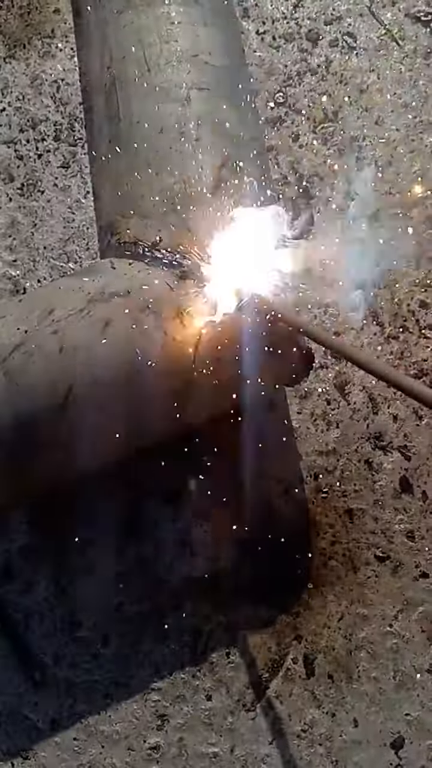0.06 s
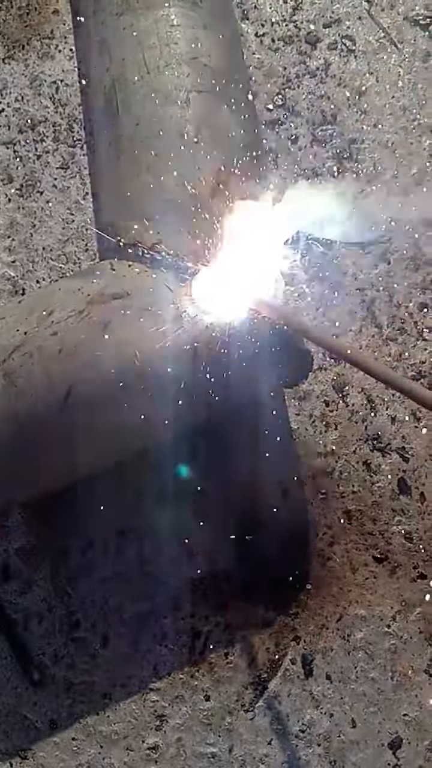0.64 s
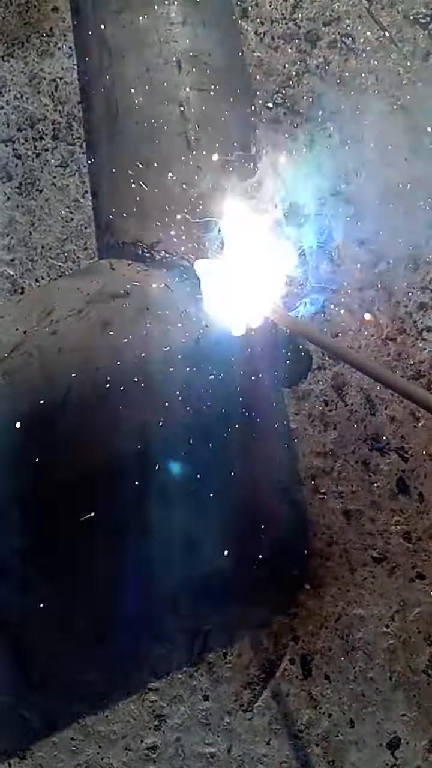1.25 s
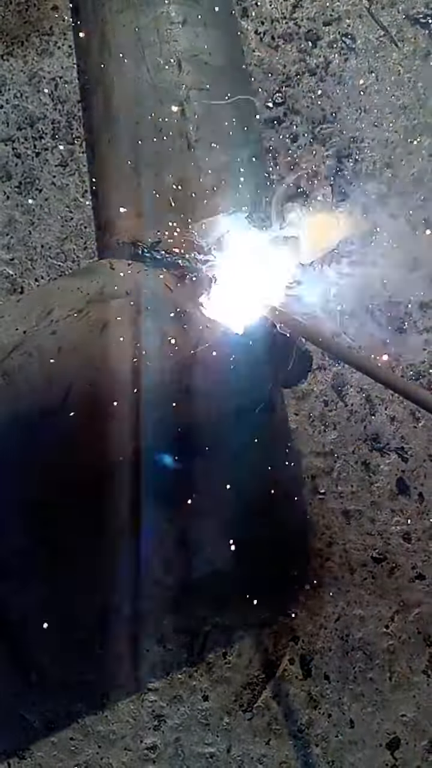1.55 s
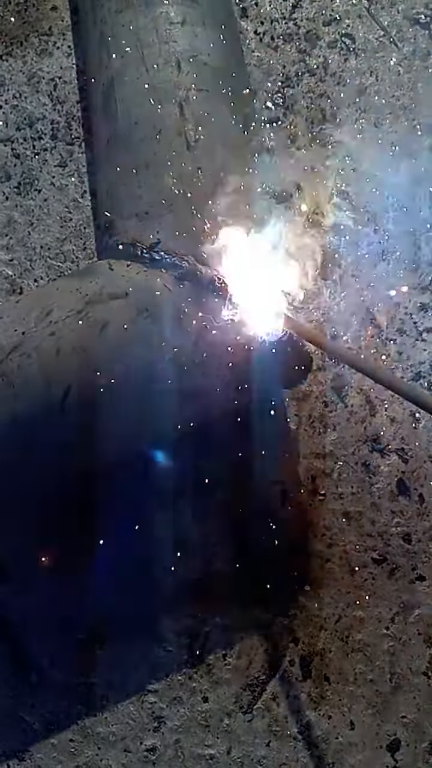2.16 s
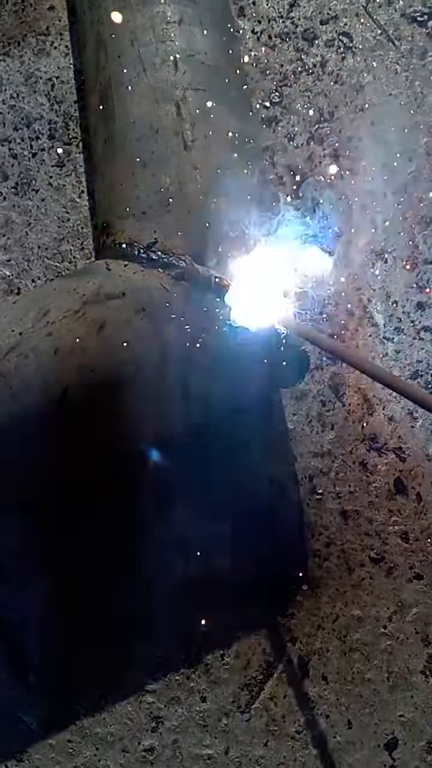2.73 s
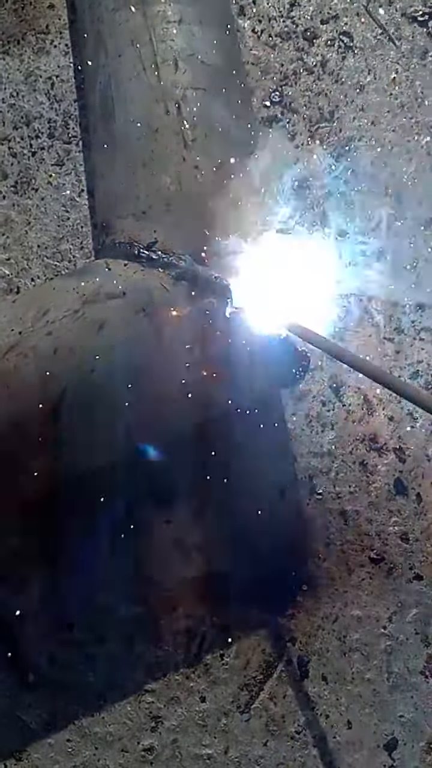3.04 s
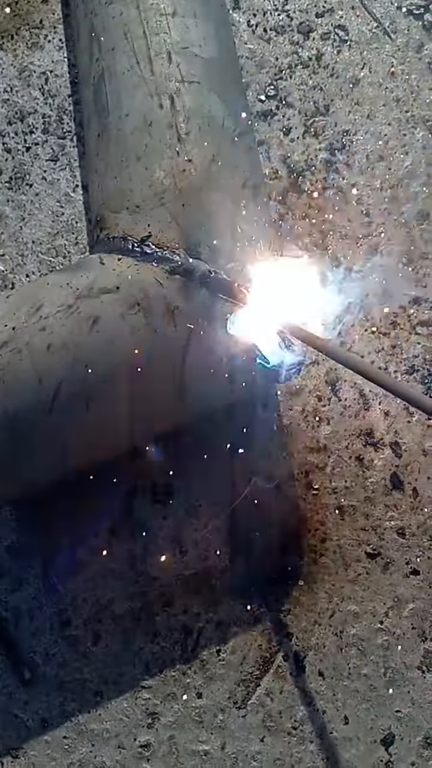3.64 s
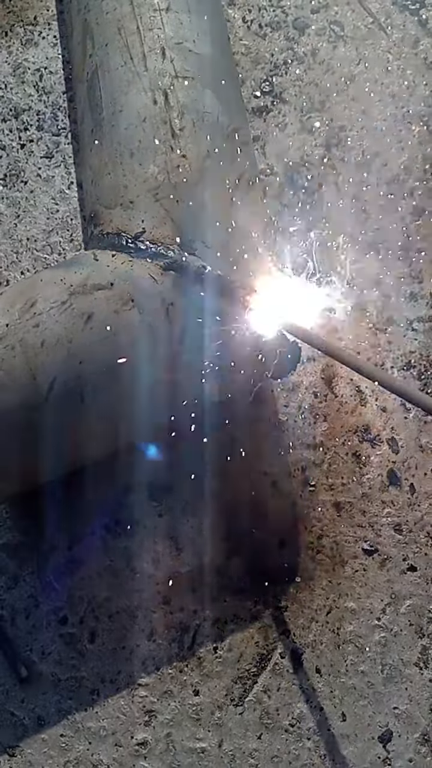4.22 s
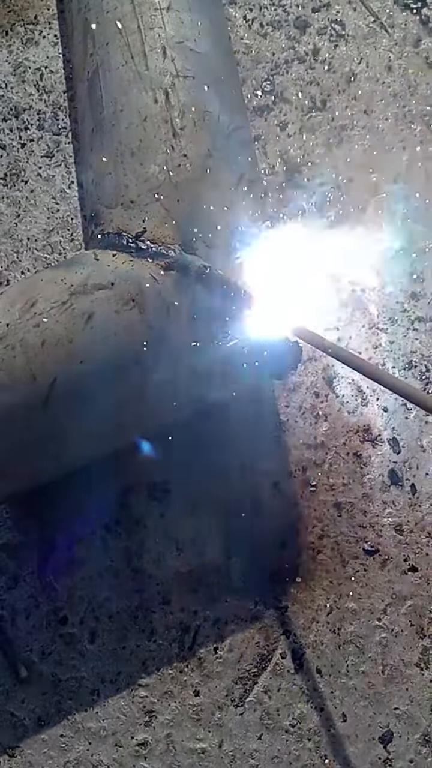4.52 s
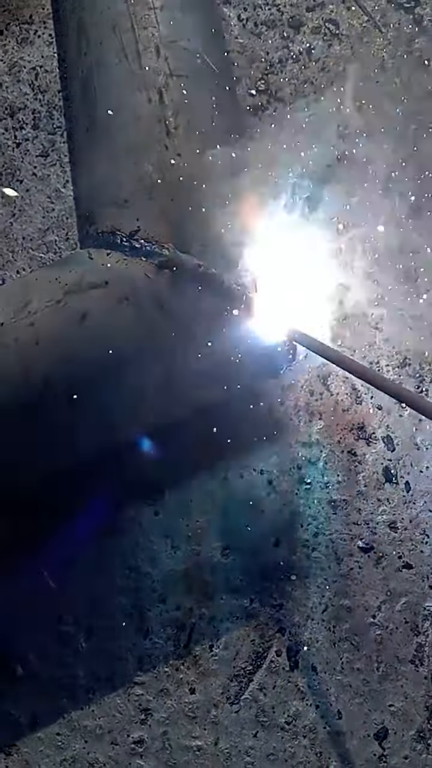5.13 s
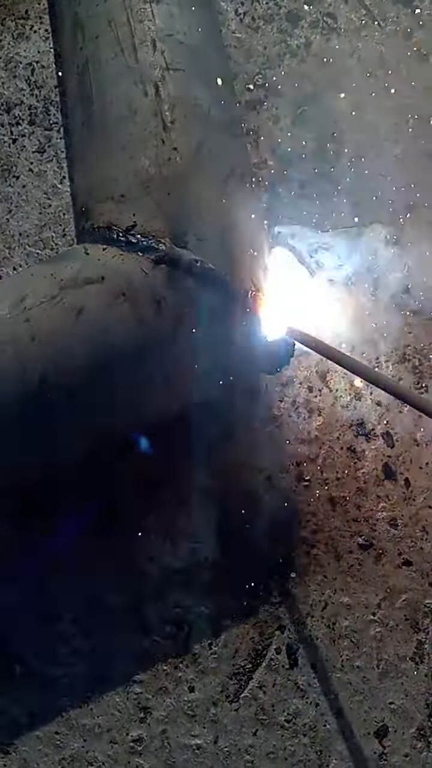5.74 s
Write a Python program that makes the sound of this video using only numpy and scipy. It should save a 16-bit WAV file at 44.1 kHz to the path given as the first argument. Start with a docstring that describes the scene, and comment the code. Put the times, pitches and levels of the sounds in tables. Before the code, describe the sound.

A welding arc fries and spits steadily on a steel pipe, with a squeaky metal saw and a faint hum behind it.

```python
"""Stick welding, with a saw nearby

A stick electrode burns on a steel pipe joint, close by: the arc sizzles and crackles, drops of metal
snap across it, and gas from the coating flares up and puffs out with low thuds. Pipe and floor colour
the crackle as the tip moves along the seam. A low hum runs underneath. Nearby someone saws metal:
six quick squealing strokes, later four slow, light ones."""
import sys
import numpy as np
from scipy import signal
from scipy.fft import rfft, irfft, next_fast_len
from scipy.io import wavfile
from scipy.ndimage import uniform_filter1d, minimum_filter1d, map_coordinates

SR = 44100
rng = np.random.default_rng(int(sys.argv[2]) if len(sys.argv) > 2 else 0)


def unload_audio(sound):
    """Save the sound as a 16-bit wav file, at the path given as the first command line argument."""
    columns = np.transpose(np.atleast_2d(sound))
    # keep every value between -1 and 1, then stretch to whole-number steps
    steps = np.round(np.clip(columns, -1, 1) * 32767)
    wavfile.write(sys.argv[1], SR, steps.astype(np.int16))


N = 254898

# How hard the arc burns as its length drifts: time_s, sizzle_db, fizz_db
ARC_LEVELS = [(0, -25.5, -19.5), (.2, -27, -26.5), (.32, -29, -26), (.56, -30.5, -26), (.8, -21, -22),
              (1.3, -25.5, -21.5), (1.6, -25, -22), (1.9, -27.5, -24.5), (2.05, -26, -23.5),
              (2.53, -28, -26), (2.7, -28.5, -25), (3.15, -26, -24), (3.42, -31, -28), (3.95, -31.5, -31.5),
              (4.3, -29.5, -30.5), (4.5, -28.5, -25.5), (5.55, -25.5, -24.5), (5.78, -30, -25)]
# The coating flares up in a cloud of gas: start_s, length_s, flutter_db, sputter_db, crackle_lift_db
FLARES = [(0.182, 0.046, -38.5, -29.5, 3), (0.451, .11, -36.5, -37, 0), (0.665, 0.25, -29, -26, 2.5),
          (0.942, 0.09, -38.5, -31, 1.5), (1.21, 0.13, -28, -31, 2.5), (1.424, 0.061, -38, -26, -4),
          (1.694, 0.23, -42, -38, 3), (2.13, 0.21, -43, -39.5, 4.5), (2.588, 0.22, -40.5, -33.5, 6),
          (2.717, 0.069, -28.5, -34, 6.5), (2.857, .04, -33, -42, -13), (2.947, 0.036, -31.5, -38, 2),
          (3.442, 0.033, -37, -34.5, -3), (3.794, 0.016, -37.5, -35.5, 3), (3.88, 0.016, -42, -39, 4),
          (3.995, 0.018, -45, -48, 4), (4.969, 0.19, -33, -30, 2.5), (5.063, 0.047, -43, -47, 6.5),
          (5.264, 0.14, -38, -36, 3.5), (5.358, 0.22, -28.5, -27.5, 2.5), (5.554, 0.13, -36.5, -27, 3)]
# Showers of fine sparks brighten the fizz: start_s, length_s, lift_db
SHOWERS = [(.025, 0.036, 1.5), (0.81, 0.054, 3.5), (2.615, 0.047, 6.5), (3.078, 0.034, 3.5),
           (5.055, 0.023, 1.5)]
# The electrode dips too close and the arc nearly stalls: start_s, length_s, gain_db
STALLS = [(1.095, 0.05, -2), (1.544, 0.054, -3.5), (1.966, 0.08, -2.5), (2.835, 0.028, -3.5),
          (3.486, 0.036, -3.5), (3.732, 0.025, -3.5), (4.554, 0.023, -6), (5.143, .03, -6.5),
          (5.2, .06, -1.5)]
# Large drops of metal short the arc: time_s, level_db, tilt_db_per_octave
LARGE_DROPS = [(.0238, -6, 1), (.0972, 1, 3), (.1865, 1, 1), (.2194, -6, 1), (.537, -5, 0), (.6015, -5, 2),
               (1.0965, -4, 0), (1.2605, -4, -1), (1.377, 0, 2), (1.4775, -4, 3), (1.5344, -6, 0),
               (1.6382, -6, 2), (1.9659, -4, 2), (1.9735, -6, 2), (2.7322, -5, 0), (2.8224, -5, 0),
               (2.869, 2, 1), (2.9023, -5, 0), (3.038, -4, -3), (3.1283, -3, 1), (3.166, 1, 1),
               (3.2101, -7, 0), (3.3109, -9, 0), (3.4738, -4.5, 1), (3.4804, -6, 1), (3.5573, -11, 0),
               (3.8832, -4, -1), (3.8924, -9, -1), (3.9873, -9, 0), (4.0002, -6, -4), (4.0244, -9, -4),
               (4.155, -5, -3), (4.1964, -11, -3), (4.359, -5, -2), (4.4284, -10, 2), (4.507, -3, 0),
               (4.748, -9, -4), (4.8399, -7, -1), (5.0794, -4, 0), (5.1936, -5, 1), (5.2964, -3, -2),
               (5.5754, -5, 2), (5.7329, -7, 0)]
# Pockets of gas burst: time_s, level_db, pitch_hz
PUFFS = [(0.237, -21.5, 116), (.599, -6.5, 189), (0.67, -12, 257), (1.263, -23, 267), (1.528, -18.5, 286),
         (1.82, -34, 212), (2.27, -35, 230), (2.336, -26, 172), (2.8, -18, 166), (3.041, -27, 330),
         (3.568, -26, 166), (3.92, -33, 169), (4.188, -28.5, 134), (4.397, -28.5, 107), (5.358, -19, 230),
         (5.3892, -11, 254)]
# Slag pops in the molten pool: time_s, level_db
POPS = [(2.962, -16), (3.448, -8), (4.984, -8), (4.995, -16), (5.047, -1.5), (5.119, -29), (5.313, -27)]
# Gas gurgles through the pool: start_s, length_s, start_hz, end_hz, level_db
GURGLES = [(1.681, 0.22, 149.6, 333, -41), (2.189, 0.2, 327, 153, -36), (2.565, 0.11, 1000, 1480, -36),
           (2.66, 0.11, 695, 798, -32.5), (2.696, 0.104, 1170, 1110, -29),
           (2.943, 0.099, 1308, 1237, -31.5), (3.076, 0.048, 1340, 1370, -32), (3.46, 0.1, 192, 116, -38.5),
           (5.414, 0.14, 690, 728, -30)]
# The tone of the bright crackle: frequency_hz, level_db
CRACKLE_TONE = [(400, -18), (700, -12.5), (1400, -5.5), (1750, -9), (2800, -2.5), (3600, 1.5), (4500, -4),
                (5800, -7.5), (6700, 3.5), (8200, 3), (9100, -2), (9900, -19.5), (11600, -26), (12400, -40),
                (15800, -44)]
# The tone of the low, flame-like flutter: frequency_hz, level_db
FLUTTER_TONE = [(25, -24), (50, -43), (85, -3), (190, 0), (300, 1), (480, -13), (900, -65)]
# The tone of the hollow sputter: frequency_hz, level_db
SPUTTER_TONE = [(250, -28), (480, -11.5), (700, 4.5), (900, -1.5), (1150, 5.5), (1450, 2.5), (1750, 0.5),
                (2600, -60.5)]
# Bands that pipe and floor boost or cancel, at three places on the seam: centre_hz, width_hz, gain_db
SEAM_START = [(1625, 115, -14), (2000, 340, 7.5), (2606, 170, 8.5), (4561, 230, 7), (4950, 125, -6),
              (5400, 90, -5), (6750, 154, 8.5), (7070, 190, -9), (7970, 770, 9), (8350, 200, -22),
              (9070, 100, -10), (9440, 130, 9.5), (11560, 180, 15)]
SEAM_MIDDLE = [(844, 65, -11.5), (1637, 126, -18.5), (1935, 350, 4.5), (2643, 190, 6), (3370, 17, 7),
               (4790, 76, -22), (5060, 430, 7), (5770, 240, -10), (6680, 130, 11.5), (7160, 130, -10),
               (7965, 220, 10.5), (8290, 97, -31), (9290, 110, -27)]
SEAM_END = [(880, 70, -7), (1386, 64, 6), (1820, 114, -12), (2360, 230, -12), (2730, 130, -7.5),
            (3160, 70, -13), (4340, 54, 6), (4340, 81, -11.5), (4640, 86, -29), (5160, 540, 10.5),
            (5480, 70, -8), (6826, 190, 15.5), (7180, 460, -9), (8544, 370, 12), (8690, 123, -22),
            (9210, 160, 8)]
# Bands that are raised or lowered wherever the tip is: centre_hz, width_hz, gain_db
TREBLE_BANDS = [(2408, 55, -8.5), (3050, 62, -3), (3335, 85, 3), (3640, 75, 1), (4160, 94, -3.5),
                (5370, 40, 3), (6160, 70, -2), (6060, 70, 6), (6550, 60, -0.5), (7400, 88, -1),
                (7320, 96, 3.5), (7600, 70, 2.5), (10680, 150, 14.5), (10790, 152, -24), (11250, 230, 2.5),
                (13800, 350, 12)]
# The tip's path along the seam: time_s, place (0 start, 1 middle, 2 end)
TIP_PATH = [(0, 0), (1.2, 0.25), (1.8, 0.9), (3.3, 1.18), (4.1, 1.7558), (4.8, 1.4344), (5.78, 2.5)]
# Pushes of the saw: start_s, pitch_hz, squeal_db, scrape_db, ring_db, drone_db
SAW_STROKES = [(.114, 876.6, -14.5, -21, -20, -54), (.374, 866, -13, -20.5, -16.5, -53),
               (.642, 878, -14.5, -19, -20, -49), (.908, 844, -16.5, -29, -23.5, -41),
               (1.162, 879, -11.5, -23, -23, -39), (1.435, 811, -19.5, -34, -26, -45),
               (2.53, 867, -33, -45, -29.5, -44), (2.864, 851, -39, -45, -38, -43),
               (3.222, 853, -34.5, -43, -41.5, -37.5), (3.574, 842, -34, -38, -34, -32)]
# The notes at which the sawn metal rings: pitch_hz, width_hz, level_db
METAL_NOTES = [(402, 33, -10.5), (580, 16, 3), (770, 90, 1.5), (824.4, 33, 8), (940, 24, -1),
               (989, 18, 4.5), (1030, 26, -4), (1204, 7.4, -4), (1324, 30, -4), (1520, 17, 2.5),
               (1780, 29, -4), (2046, 7.8, -5), (2980, 31, -11), (3140, 30, -7), (3700, 21, -37),
               (3944, 35, 3.5), (4700, 65, -6), (5510, 47, -34), (5900, 50, -19)]
# The tone of the scraping teeth: frequency_hz, level_db
SCRAPE_TONE = [(300, -29), (700, 4), (1400, 3), (2200, -43), (3000, -1), (3900, -0.5), (5000, 2.5),
               (6200, -0.5), (8200, -5), (9000, 1.5), (10500, -44), (13000, -83)]
# The tone of the bench shaken by the saw: frequency_hz, level_db
BENCH_TONE = [(60, -29), (130, -7), (350, 7.5), (650, -15), (950, -24), (1500, -41)]
# The hum swells up: start_s, length_s, level_db
HUM_SWELLS = [(.2, 1.32, -43.5), (2.5, 2, -50)]
# How long the workshop echoes: frequency_hz, fade_s (a fade is always the time to fall by 60 dB)
ROOM_FADES = [(150, 0.26), (900, 0.51), (4000, 0.11), (12000, 0.22)]


def crackle(surge, sizzle_db, fizz_db):
    """Dense sparks make the sizzle and its bright fizz; a strong arc fries more evenly than a weak one."""
    uneven = np.interp(sizzle_db, [-30, -21], [1.0, .72])
    fine_sparks = sparks(per_s=1900, spread_db=4.3, fade_s=.005)
    fry = surge ** uneven * frying(fine_sparks ** uneven, hiss=1.0)
    sizzle, fizz = split(on_seam(fry, CRACKLE_TONE), edge_hz=6000)
    return amp(sizzle_db) * steady(sizzle) + amp(fizz_db) * steady(fizz)


def arc_surge(restless_db=1.0, ripple_db=-0.5):
    """The arc flares a little with each small spit, wavers with its length and pulses with the supply."""
    t = np.arange(N) / SR
    mains = np.sin(2 * np.pi * 60 * t) + np.sin(2 * np.pi * 120 * t)
    spits = np.sqrt(1 + sparks(per_s=330, spread_db=2, fade_s=.016))
    return spits * amp(restless_db * wobble(70) + ripple_db * mains)


def burn_levels(arc_wander_db=1.0, gas_wander_db=2.0):
    """Sizzle, fizz, flutter and sputter in dB: all follow the arc, with flares and showers on top."""
    sizzle_db, fizz_db = curves(ARC_LEVELS)
    flutter_power = amp(sizzle_db - 18.5) ** 2  # between flares the gas is far softer than the sizzle
    sputter_power = amp(sizzle_db - 14) ** 2
    lift_db = np.zeros(N)
    for start, length, flutter_db, sputter_db, crackle_db in FLARES:
        flare = swell(start, length, rise_s=.018, fade_s=.099)
        flutter_power += (amp(flutter_db) * flare) ** 2
        sputter_power += (amp(sputter_db) * flare) ** 2
        lift_db = np.maximum(lift_db, crackle_db * flare)
    shower_db = sum(db * swell(start, length, rise_s=.014, fade_s=.071) for start, length, db in SHOWERS)
    hand = wobble(18)  # the hand is never quite still
    return (sizzle_db + lift_db + .16 * shower_db + arc_wander_db * hand,
            fizz_db + .7 * lift_db + shower_db + arc_wander_db * wobble(18),
            10 * np.log10(flutter_power) + gas_wander_db * hand,
            10 * np.log10(sputter_power) + gas_wander_db * hand)


def shorts(choke_s=.0091, choke_db=-1, spatter_s=.035, spatter_db=1):
    """The arc's gain: choked by each large drop and livelier once relit; it sags in each stall."""
    gain_db = np.zeros(N)
    choke = choke_db * signal.windows.tukey(round(choke_s * SR))
    spatter = spatter_db * np.hanning(round(spatter_s * SR))
    for start, _, _ in LARGE_DROPS:
        add(gain_db, start - choke_s, choke)
        add(gain_db, start, spatter)
    for start, length, db in STALLS:
        add(gain_db, start, db * signal.windows.tukey(round(length * SR)))
    return amp(gain_db)


def snaps(sizzle_db, small_per_s=6):
    """A drop shorts the arc and blows apart: a sharp crack and a short spray, some bright, some dull."""
    track, t = np.zeros(N), np.arange(SR // 25) / SR
    small_db = sizzle_db + 16.5 + 4.5 * rng.standard_normal(N)  # small drops stand out from the sizzle
    small_drops = [(i / SR, small_db[i], 0) for i in np.flatnonzero(rng.random(N) < small_per_s / SR)]
    noise = np.sign(rng.standard_normal(N + SR))
    crack, spray = amp(-60 * t / .016), amp(-20 - 60 * t / .04)
    shape = (crack + spray) * np.minimum(t / .0011, 1)
    for start, db, tilt in [*LARGE_DROPS, *small_drops]:
        burst = shape * noise[round(start * SR):][:len(t)]
        burst = colour(burst, lambda hz: tilt * np.log2(np.clip(hz, 1000, 9000) / 5500))
        add(track, start, amp(db - 3.3) * burst)
    return on_seam(track, CRACKLE_TONE)


def gas(surge, flutter_db, sputter_db):
    """The burning coating flutters like a flame and sputters in the pool."""
    flame = frying(sparks(per_s=220, spread_db=0, fade_s=.0037), hiss=.29)
    flutter = colour(flame, lambda hz: along(FLUTTER_TONE, hz))
    spitting = frying(sparks(per_s=970, spread_db=4.5, fade_s=.015), hiss=.88)
    sputter = on_seam(surge * spitting, SPUTTER_TONE)
    return amp(flutter_db) * steady(flutter) + amp(sputter_db) * steady(sputter)


def puffs():
    """Each gas pocket gives a thud of a cycle or two that sinks in pitch as it swells."""
    track, t = np.zeros(N), np.arange(SR // 12) / SR
    for start, db, hz in PUFFS:
        cycles = hz * t
        sinking_hz = hz * (.46 + .59 * np.exp(-cycles / 2.15))
        add(track, start, amp(db) * bump(cycles / .48) * np.sin(phase_of(sinking_hz)))
    return colour(track, lambda hz: along([(25, -20), (70, 0)], hz))  # too small to give off deep bass


def pops(fade_s=.034):
    """A slag bubble opens at once with a dull, hollow pop."""
    track, t = np.zeros(N), np.arange(SR // 30) / SR
    for start, db in POPS:
        add(track, start, amp(db - 60 * t / fade_s) * rng.standard_normal(len(t)))
    return on_seam(track, SPUTTER_TONE)


def gurgles():
    """A pocket of gas sounds a fuzzy, hollow note that glides as its size changes."""
    track = np.zeros(N)
    for start, length, start_hz, end_hz, db in GURGLES:
        n = round(length * SR)
        phase = phase_of(np.geomspace(start_hz, end_hz, n))
        fuzzy = wobble(144, size=n) * np.sin(phase) + wobble(129.2, size=n) * np.cos(phase)
        add(track, start, amp(db) * np.sin(np.linspace(0, np.pi, n)) * unit(fuzzy))
    return track


def on_seam(x, tone):
    """Pipe and floor colour the sound, and the colour glides from place to place as the tip travels."""
    place, = curves(TIP_PATH)
    out = np.zeros(N)
    for k, seam_bands in enumerate([SEAM_START, SEAM_MIDDLE, SEAM_END]):
        bands = [*seam_bands, *TREBLE_BANDS]
        bands_db = lambda hz: sum(db * np.exp(-((hz - mid) / width) ** 2) for mid, width, db in bands)
        nearness = np.clip(1 - abs(place - k), 0, 1)
        out += nearness * colour(x, lambda hz: along(tone, hz) + bands_db(hz))
    return out


def saw(jitter=.035, rise_s=.02, hold_s=.007, fade_s=.125, fastest_s=.028):
    """Each push makes the blade chatter with a sagging squeal; the teeth scrape and shake the metal."""
    squeal, scrape, shake, drone = np.zeros((4, N))
    t = np.arange(SR // 5) / SR
    grip = np.sin(np.pi / 2 * np.minimum(t / rise_s, 1)) ** 2
    grip *= amp(-60 * np.maximum(t - rise_s - hold_s, 0) / fade_s)
    speed = bump(t / fastest_s) ** 2
    for start, hz, squeal_db, scrape_db, ring_db, drone_db in SAW_STROKES:
        pitch_hz = hz * (1 - .9 * t + jitter * wobble(300, size=len(t)))
        chatter = amp(1.8 * wobble(250, size=len(t)))
        add(squeal, start, amp(squeal_db + 1) * grip * chatter * np.sin(phase_of(pitch_hz)))
        for track, db in [(scrape, scrape_db), (shake, ring_db), (drone, drone_db)]:
            add(track, start, amp(db) * speed * rng.standard_normal(len(t)))
    slow_push = amp(24.5) * split(drone, edge_hz=503)[0]  # rings only the metal's lowest notes
    bench = amp(13.5) * colour(drone, lambda hz: along(BENCH_TONE, hz))
    ring = sawn_metal(shake + slow_push + amp(-16) * squeal)
    teeth = amp(4.5) * colour(blade(scrape), lambda hz: along(SCRAPE_TONE, hz))
    return squeal + bench + ring + teeth


def sawn_metal(push):
    """The piece being cut rings at its own notes when shaken."""
    size = next_fast_len(N + SR // 2)
    hz = np.fft.rfftfreq(size, 1 / SR)
    response = sum((-1) ** k * amp(db) * 1j * hz * width / (pitch ** 2 - hz ** 2 + 1j * hz * width)
                   for k, (pitch, width, db) in enumerate(METAL_NOTES))
    response /= np.sqrt(np.mean(np.abs(response) ** 2))
    return irfft(rfft(push, size) * response, size)[:N]


def blade(scrape, notes=45, low_hz=2800, high_hz=7500, fade_s=.061, ring_db=-3.5):
    """The scrape, plus the many high notes it sets ringing in the thin steel blade."""
    t = np.arange(SR // 5) / SR
    hz = rng.uniform(low_hz, high_hz, (notes, 1))
    ring = np.sin(2 * np.pi * (hz * t + rng.random((notes, 1)))).sum(axis=0) * amp(-60 * t / fade_s)
    return scrape + amp(ring_db) * signal.fftconvolve(scrape, ring / np.linalg.norm(ring))[:N]


def hum(pitch_hz=64):
    """A low, slightly unsteady machine hum that swells twice."""
    level = sum(amp(db) * swell(start, length, rise_s=.3, fade_s=.3) for start, length, db in HUM_SWELLS)
    wavering_hz = pitch_hz * (1 + .02 * wobble(6))
    return level * amp(.82 * wobble(6.9)) * np.sin(phase_of(wavering_hz))


def room(x):
    """The workshop's short echo; the middle pitches last longest."""
    hz, t, noise = signal.stft(rng.standard_normal(SR // 2), SR, nperseg=256)
    fading = amp(-60 * t / along(ROOM_FADES, hz)[:, None])
    tail = signal.istft(noise * fading, SR, nperseg=256)[1]
    tail = np.pad(tail, (SR // 80, 0))  # the echo arrives a moment late
    return signal.fftconvolve(x, tail / np.linalg.norm(tail))[:N]


def sparks(per_s, spread_db, fade_s):
    """The power, averaging 1, of random bursts of unequal size that start at once and die fast."""
    fires = rng.random(N) < per_s / SR
    energy = fires * amp(spread_db * np.clip(rng.standard_normal(N), -3, 2)) ** 2
    t = np.arange(SR // 10) / SR
    power = np.abs(signal.fftconvolve(energy, amp(-60 * t / fade_s) ** 2)[:N])
    return power / power.mean()


def frying(power, hiss):
    """Noise that follows the sparks' power, over a share of smooth hiss."""
    return np.sqrt(power + hiss) * rng.standard_normal(N)


def colour(x, gain_db, size=4096):
    """Filter a sound; gain_db says how much to raise or lower each frequency."""
    cepstrum = irfft(np.log(amp(gain_db(np.fft.rfftfreq(size, 1 / SR)))))
    cepstrum[1:size // 2] *= 2  # folded so the filter rings only after a sound, never before
    cepstrum[size // 2 + 1:] = 0
    return signal.fftconvolve(x, irfft(np.exp(rfft(cepstrum))))[:len(x)]


def split(x, edge_hz):
    """The low part of a sound, and what remains when that is taken away."""
    low = signal.sosfiltfilt(signal.butter(6, edge_hz, fs=SR, output="sos"), x)
    return low, x - low


def steady(x, size=3001):
    """Hold the slow level at 1 and keep the fast grain."""
    slow_power = uniform_filter1d(uniform_filter1d(x ** 2, size), size)
    return x / np.sqrt(np.abs(slow_power) + 1e-12)


def swell(start, length, rise_s, fade_s):
    """A level that rises, holds and dies away."""
    t = np.arange(N) / SR - start
    return np.clip(t / rise_s, 0, 1) * amp(-60 * np.maximum(t - length, 0) / fade_s)


def bump(x):
    """A quick rise to 1 at x = 1, then a slower fall."""
    return x * np.exp(1 - x)


def wobble(per_s, size=N):
    """A smooth curve through per_s random points a second."""
    points = rng.standard_normal(int(size * per_s / SR) + 4)
    return map_coordinates(points, [np.arange(size) * per_s / SR])


def curves(rows):
    """One value per sample for each column after the time."""
    times, *columns = np.transpose(rows)
    return [np.interp(np.arange(N) / SR, times, column) for column in columns]


def along(points, hz):
    """Read between (frequency_hz, value) points, spaced by octaves."""
    point_hz, values = np.transpose(points)
    return np.interp(np.log(hz + 1), np.log(point_hz + 1), values)


def phase_of(hz):
    """The running angle of a wave whose pitch changes."""
    return 2 * np.pi * np.cumsum(hz) / SR


def add(track, start_s, sound):
    """Mix a sound into a track."""
    part = track[max(round(start_s * SR), 0):][:len(sound)]
    part += sound[:len(part)]


def amp(db):
    """Decibels to gain."""
    return 10 ** (np.asarray(db) / 20)


def unit(x):
    """Scale to an average power of 1."""
    return x / np.sqrt(np.mean(x ** 2) + 1e-20)


def scene():
    """The arc is near, with little echo; the saw is further off and rings in the room."""
    surge = arc_surge()
    sizzle_db, fizz_db, flutter_db, sputter_db = burn_levels()
    arc = shorts() * (crackle(surge, sizzle_db, fizz_db) + gas(surge, flutter_db, sputter_db))
    weld = arc + snaps(sizzle_db) + puffs() + pops() + gurgles()
    sawing = saw()
    return (weld + sawing + hum() + room(amp(-18.5) * weld + amp(-8.5) * sawing))[None]


def record(dry, ceiling=.92, top_hz=15850):
    """A quick limiter holds down the loudest cracks, and the very highest treble is cut off."""
    needed_gain = np.minimum(1, ceiling / (np.abs(dry) + 1e-9))
    limited = dry * uniform_filter1d(minimum_filter1d(needed_gain, size=131), size=111)
    size = next_fast_len(N + SR // 4)
    kept = np.fft.rfftfreq(size, 1 / SR) < top_hz
    return irfft(rfft(limited, size) * kept, size)[:, :N]


dry = scene()
out = record(dry)
unload_audio(out)
```